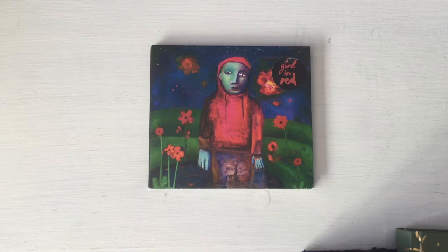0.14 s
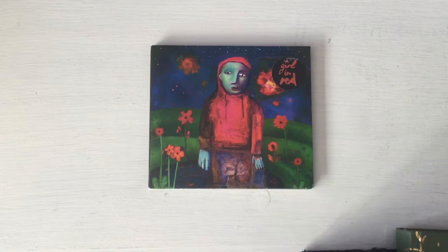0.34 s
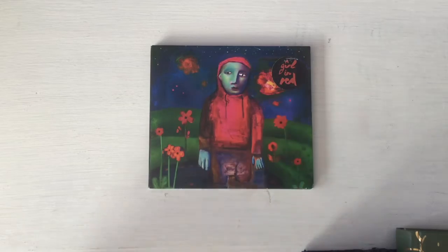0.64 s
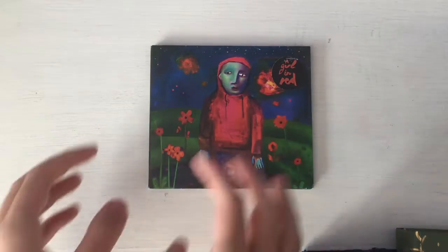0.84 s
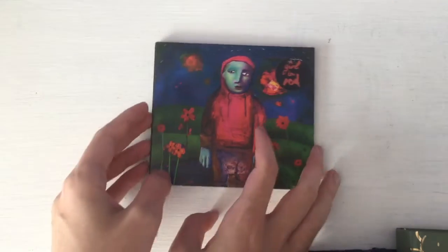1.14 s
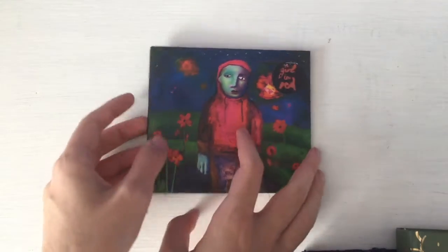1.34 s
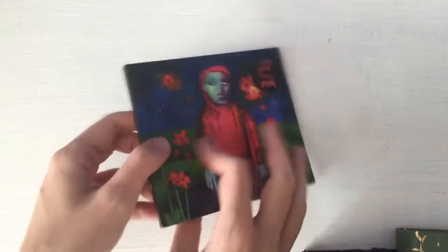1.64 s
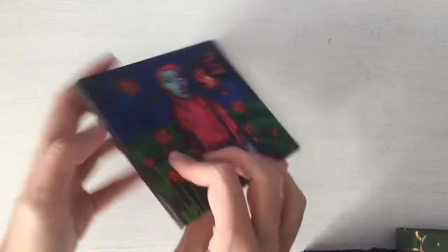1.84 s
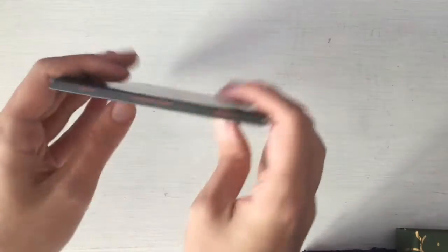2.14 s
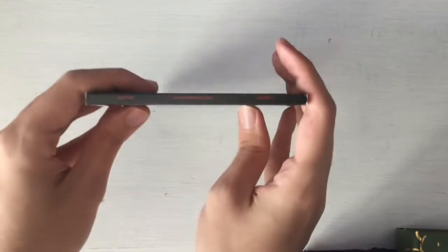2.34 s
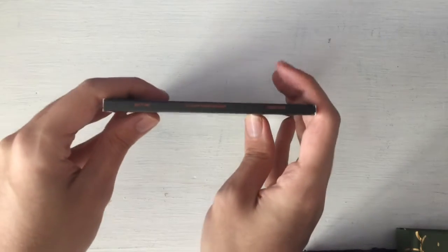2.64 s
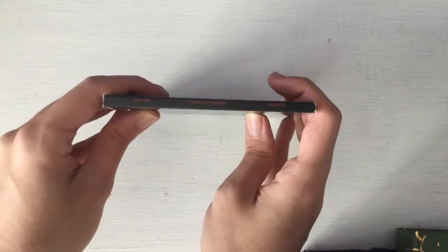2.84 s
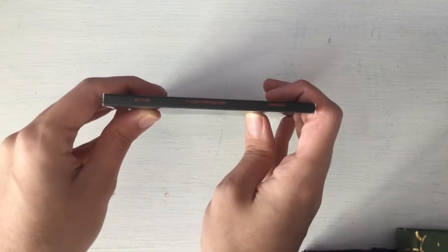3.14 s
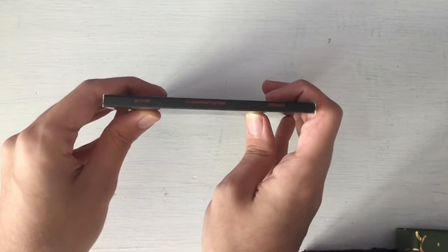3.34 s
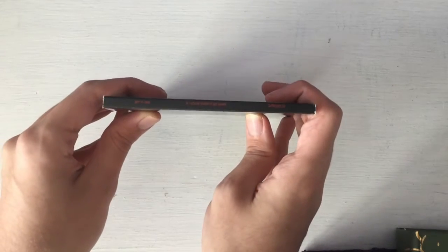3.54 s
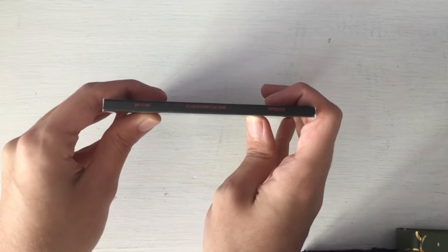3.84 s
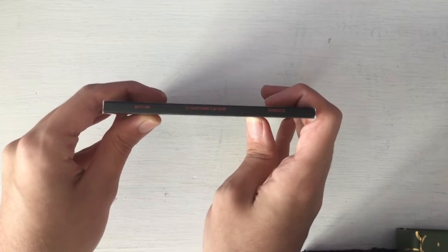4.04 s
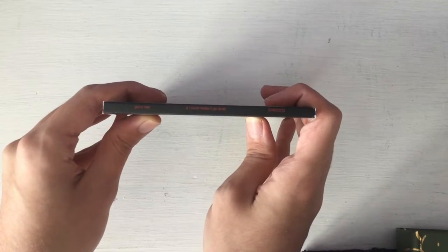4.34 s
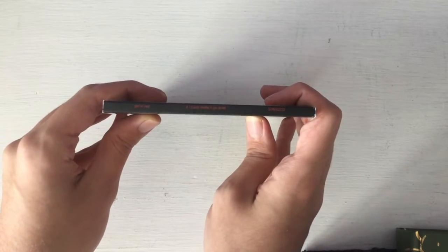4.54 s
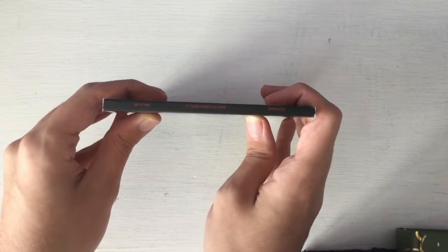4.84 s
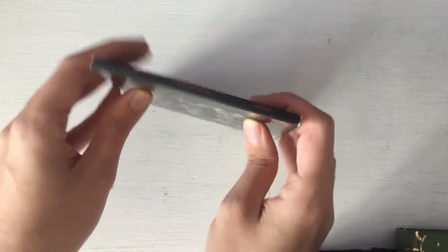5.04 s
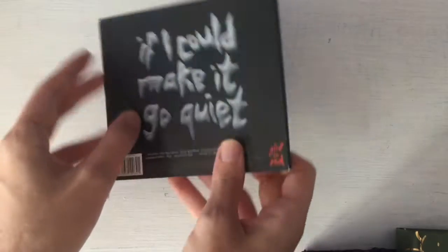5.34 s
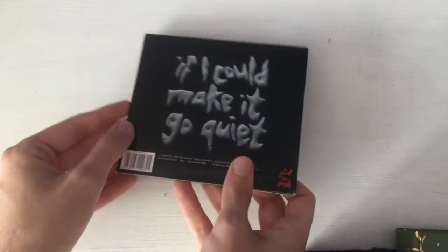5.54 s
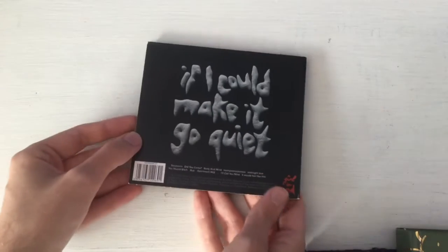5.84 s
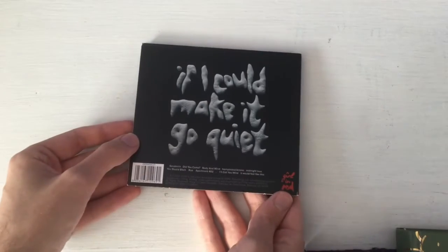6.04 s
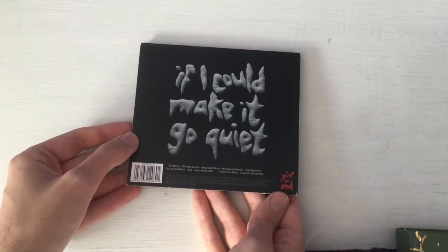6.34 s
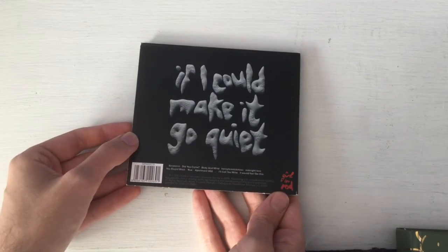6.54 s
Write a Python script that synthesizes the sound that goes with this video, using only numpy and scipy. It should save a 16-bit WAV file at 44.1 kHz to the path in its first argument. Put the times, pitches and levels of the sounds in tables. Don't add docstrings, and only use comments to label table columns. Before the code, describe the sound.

A quiet small room, captured close by a phone microphone with thin bass and slightly dulled top; low lumpy rumble and soft hiss run throughout. Only faint background rustle until about 1.0 s, when fingers touch a flat hollow cardboard case with light pads and papery skin slips. From 1.35 to 2.2 s a longer dry slide scrapes and fizzes over the gloss, with crisp ticks around 1.5 s and smaller ones near 2.0 s. At 2.5 s a hard regrip cracks and knocks, with a softer landing at 2.64 s, then faint brushes and dull taps until 3.2 s. Near stillness follows. At 4.9 s the case turns quickly: a strong hollow thump with clustered cracks at 4.95 s, scrapes easing by 5.15 s. From 5.3 s brighter slides, a sharp crack at 5.58 s, low taps near 5.7 s and tiny ticks to 5.9 s, then room tone until 6.7 s.

```python
import sys
import numpy as np
from scipy import signal
from scipy.fft import rfft, irfft, next_fast_len
from scipy.io import wavfile
from scipy.ndimage import uniform_filter1d

SR = 44100
rng = np.random.default_rng(int(sys.argv[2]) if len(sys.argv) > 2 else 0)


def convert_level_to_amplitude(level_db):
    exponent = np.asarray(level_db, float) / 20
    return 10 ** exponent


def generate_wav(signal):
    frames = np.transpose(np.atleast_2d(signal))
    scaled = np.clip(frames, -1, 1) * 32767
    pcm = np.round(scaled).astype(np.int16)
    wavfile.write(sys.argv[1], SR, pcm)


N = 294981

FLEX_HZ = 166
TICK_T60_S, TICK_RISE_S, TICK_CLICK = 0.019, 0.0011, 5.5
SNAP_T60_S, SNAP_RISE_S, SNAP_CLICK = 0.025, 0.000496, 5.5
CRACK_T60_S, CRACK_RISE_S, CRACK_CLICK = 0.009, 0.000403, 5.1


def evened(x):
    return x / np.sqrt(np.mean(x ** 2) + 1e-20)


def read(points, hz):
    f, value = np.transpose(points)
    return np.interp(np.log(hz + 1), np.log(f + 1), value)


def add(mix, s, sound):
    part = mix[round(s * SR):][:len(sound)]
    part += sound[:len(part)]


def colour(x, points):
    size = next_fast_len(len(x))
    gain = convert_level_to_amplitude(read(points, np.fft.rfftfreq(size, 1 / SR)))
    return evened(irfft(rfft(x, size) * gain, size)[:len(x)])


def resonate(x, hz, width):
    turn = np.exp(2j * np.pi * np.cumsum(hz * np.ones(len(x))) / SR)
    r = np.exp(-np.pi * width / SR)
    return 2 * (turn * signal.lfilter([1 - r], [1, -r], x / turn + 1e-18)).real


def slips(count, lumpy_db, lump_s):
    lumps = evened(uniform_filter1d(rng.standard_normal(count), max(round(lump_s * SR), 2)))
    catches = 1 + 2.5 * (rng.random(count) < 500 / SR)
    return evened(rng.standard_normal(count) * convert_level_to_amplitude(lumpy_db * lumps) * catches)


def patchy(x, patchy_db):
    z = signal.stft(x, nperseg=256)[2]
    patches = uniform_filter1d(rng.standard_normal(z.shape), 4, 0)
    patches = evened(uniform_filter1d(patches, 9, 1))
    return evened(signal.istft(z * convert_level_to_amplitude(patchy_db * patches), nperseg=256)[1][:len(x)])


def air():
    # frequency in Hz, level in dB per Hz
    air_spectrum = [(15, -53), (25, -14.5), (71, -1.5), (169, -2.5), (219, -5.5), (263, -6.5), (548, -18.5),
                    (694, -19), (1030, -24), (2250, -22), (2630, -22), (3900, -22), (8780, -23),
                    (13000, -31)]
    # time in seconds, lift in dB
    rustle = [(0, 4.5), (.55, 5), (.95, 8.5), (1.4, 6.5), (2.3, 3), (4.8, 3), (6.0, 4.5), (6.7, 2.5)]
    air_db, rumble_db = -66.5, 1.36
    frames, hz = N // 256 + 5, np.fft.rfftfreq(1024, 1 / SR)
    a, b = rng.standard_normal((frames, 513, 2)).T
    s, hiss_db = np.transpose(rustle)
    t = np.arange(frames) * 256 / SR
    lumps = evened(uniform_filter1d(rng.standard_normal(frames), 9))
    low = (1 / (1 + (hz / 420) ** 4))[:, None]
    drift = low * (rumble_db + 2.7 * lumps) + (1 - low) * np.interp(t, s, hiss_db)
    plain = signal.istft(a + 1j * b, nperseg=1024, noverlap=768)[1][:N]
    steady = colour(plain, air_spectrum + [(16000, -57)])
    z = signal.stft(steady, nperseg=1024, noverlap=768)[2]
    drifting = signal.istft(z * convert_level_to_amplitude(drift[:, :z.shape[1]]), nperseg=1024, noverlap=768)[1][:N]
    return convert_level_to_amplitude(air_db) * drifting


def squeeze(s, length, db):
    push = slips(round(length * SR), lumpy_db=2.8, lump_s=0.015)
    panel = resonate(resonate(push, 210, 92), 330, 230)
    flex = resonate(resonate(push, FLEX_HZ, 60), FLEX_HZ, 130)
    return s, convert_level_to_amplitude(db) * evened(panel + 0.4 * flex) * np.hanning(len(push))


def squeezes(mix):
    # start in seconds, length in seconds, level in dB
    grips = [(1.0, .12, -61), (1.09, .07, -52), (1.13, .06, -62), (1.28, 0.076, -63), (1.38, 0.29, -61.5),
             (1.9, .09, -62), (2.06, .12, -59), (2.5, 0.16, -53.5), (2.64, 0.23, -70), (2.88, .13, -56.5),
             (3.03, 0.22, -61), (4.89, .08, -63), (4.96, 0.084, -50.5), (5.0, .13, -60), (5.42, 0.066, -72),
             (5.665, 0.038, -56), (5.71, .1, -56.5)]
    for row in grips:
        add(mix, *squeeze(*row))


def thump(s, db, hz, t60, flex_db, panel):
    t = np.arange(round(0.25 * SR)) / SR
    ring = convert_level_to_amplitude(flex_db - 60 * t / 0.099) * np.sin(2 * np.pi * FLEX_HZ * t)
    for ratio, mode_db, share, side in panel:
        decay = convert_level_to_amplitude(mode_db - 60 * t / (t60 * share))
        ring = ring + np.sign(side) * decay * np.sin(2 * np.pi * hz * ratio * t)
    ring = -ring * (1 - np.exp(-t / 0.0027))
    return s + 0.002, convert_level_to_amplitude(db) * ring / abs(ring).max()


def thumps(mix):
    # time in seconds, peak in dB, pitch in Hz, t60 in seconds
    middle_taps = [(0.997, -53, 261, 0.17), (1.101, -50, 178, 0.082), (1.141, -45.5, 277, 0.15),
                   (1.17, -42, 268, 0.044), (1.304, -48, 273, 0.064), (1.326, -53, 258, 0.06),
                   (1.537, -52, 387, 0.13), (2.679, -50.5, 270, 0.062), (2.918, -52, 261, 0.15),
                   (2.954, -41, 268, 0.055), (3.0275, -38.5, 282, 0.042), (3.554, -49.5, 147, 0.16),
                   (4.9513, -32, 285, 0.04), (4.9548, -21.5, 285, 0.1), (4.974, -41, 190, .045),
                   (4.981, -35, 348, 0.055), (4.996, -44, 330, .05), (5.6662, -38.5, 277, 0.064),
                   (5.734, -38, 176, 0.063), (5.755, -42.5, 278, 0.16), (5.772, -46, 270, 0.057),
                   (6.36, -57, 151, 0.067)]
    edge_taps = [
        (1.023, -51.5, 354, 0.062),
        (2.072, -52.5, 236, 0.061),
        (2.121, -42, 160, 0.09),
        (2.507, -36, 277, 0.12),
        (2.6375, -40, 265, 0.07),
        (2.803, -45, 259, 0.089),
        (3.076, -46.5, 155, 0.14),
        (3.147, -50, 340, 0.07),
        (4.92, -41.5, 276, 0.27),
        (5.575, -43.5, 254, 0.093),
    ]
    # pitch ratio, level in dB, share of the t60, side of the node line (+1 or -1)
    middle_modes = [(1.0, 11, 0.64, 1), (1.3, -7.5, .9, 1), (1.53, -5.5, 0.86, -1), (1.93, -15.5, 1, 1),
                    (2.6, -29, 0.56, -1)]
    edge_modes = [(1.0, 11, 0.7, 1), (1.3, -12, .9, 1), (1.53, -8, 1.3, -1), (1.93, -16, 1.3, 1),
                  (2.33, -24, 1.1, -1)]
    for rows, flex_db, modes in ((middle_taps, -17, middle_modes), (edge_taps, -2.5, edge_modes)):
        for row in rows:
            add(mix, *thump(*row, flex_db, modes))


def knock(s, db, hz, contact):
    lag_s = 0.0005
    t = np.arange(0, contact, 1 / SR)
    swing = np.cos(2 * np.pi * hz * (t - contact / 2 - lag_s))
    return s, convert_level_to_amplitude(db) * swing * np.sin(np.pi * t / contact) ** 2


def knocks(mix):
    # time in seconds, peak in dB, pitch in Hz, contact in seconds
    landings = [
        (2.4993, -19, 295, .008),
        (2.5064, -25.5, 275, .0085),
        (2.6356, -31.5, 225, .0095),
        (3.1405, -43, 330, .008),
        (1.3185, -45, 270, .011),
    ]
    for row in landings:
        add(mix, *knock(*row))


def tick(s, db, hz, treble_db, t60, rise, click):
    grit = rng.standard_normal(5000)
    t = np.arange(len(grit)) / SR - 0.005
    onset = np.exp(np.minimum(t - rise, 0) / rise)
    burst = grit * onset * convert_level_to_amplitude(-60 * np.maximum(t, 0) / t60)
    tail = grit * onset * convert_level_to_amplitude(-60 * np.maximum(t, 0) / 0.12)
    gritty = burst + convert_level_to_amplitude(-21) * tail
    struck = gritty + click * np.exp(-((t - rise) * SR) ** 2)
    width = min(350 + 0.15 / rise, 0.4 * hz)
    body = resonate(resonate(struck, hz, width), hz, 3.1 * width)
    overtone = resonate(resonate(struck, 1.45 * hz, 1.1 * hz), 1.59 * hz, 1.5 * hz)
    body = body + convert_level_to_amplitude(-16) * overtone
    body = signal.sosfilt(signal.butter(3, 0.54 * hz, "highpass", fs=SR, output="sos"), body)
    treble = resonate(resonate(gritty, 9100, 2500), 9000, 4000)
    broad = resonate(resonate(resonate(gritty, 8000, 5500), 6900, 6000), 7000, 6000)
    treble = treble + convert_level_to_amplitude(-6) * broad
    sound = body / abs(body).max() + convert_level_to_amplitude(treble_db - 2.0) * treble / abs(treble).max()
    return s - 0.005, convert_level_to_amplitude(db) * sound


def ticks(touch):
    # time in seconds, peak in dB, ring in Hz, treble in dB
    edge_ticks = [(1.1033, -43.5, 3450, -5), (1.1677, -48.5, 2100, -20), (1.2281, -52, 1540, -2),
                  (1.4918, -31.5, 2120, -13), (1.5393, -27, 2200, -14), (1.9135, -41.5, 2940, 3),
                  (1.942, -36, 2110, -5), (2.0078, -35, 2950, -22), (2.0175, -38, 2930, -14),
                  (2.028, -39, 2950, -18), (2.072, -40, 1650, -7), (2.1216, -35.5, 1640, -14),
                  (2.6632, -56, 2580, -3), (2.681, -54.5, 2580, -3), (2.9344, -48.5, 2600, 5.5),
                  (3.027, -54, 1380, 10), (4.9123, -40, 4800, -12), (4.9994, -40.5, 1290, -12),
                  (5.0675, -33.5, 2050, -16), (5.5928, -53, 1220, -21), (5.642, -42.5, 2616, -20),
                  (5.6841, -45, 1360, -22), (5.7435, -49, 3380, -25), (5.848, -49, 1320, -11),
                  (5.8755, -51, 1370, -8), (5.8999, -51.5, 1340, -3)]
    snaps = [
        (1.011, -55, 2120, 5),
        (1.5836, -35, 1900, -12),
        (2.956, -55, 680, -20),
        (3.029, -53, 760, -20),
        (2.6365, -48, 600, -20),
        (2.804, -60, 2600, 13),
        (3.141, -52, 560, -14),
        (5.328, -45, 2400, -3),
        (5.6683, -41, 4500, -5),
        (5.668, -46, 1900, -20),
    ]
    cracks = [(2.4988, -27, 3600, -27), (2.4993, -26.5, 1950, -30), (4.8447, -54, 3400, 3.5),
              (4.9245, -36, 2500, 5), (4.9578, -22.5, 2150, -16), (4.967, -38, 4400, -2),
              (4.975, -36, 4000, 0.1), (4.9835, -32, 2000, 1.1), (5.335, -45, 3660, -28),
              (5.3352, -44, 1900, -28), (5.3815, -41, 2800, -14), (5.5762, -23.5, 2500, -11),
              (5.708, -41, 3380, -25)]
    flicks = [(1.5372, -40, 7600, -3), (1.5565, -46, 6800, -2), (1.6395, -42, 2110, -20),
              (1.699, -44, 4000, -8), (1.848, -45, 2270, -12), (1.9085, -43, 3440, -2),
              (2.5045, -40, 3500, -15), (4.8928, -48, 1900, -12), (4.9615, -40, 9200, -5),
              (5.034, -50, 3800, -6), (5.0668, -39, 6500, -2), (5.102, -55, 5000, -2),
              (5.1357, -53, 6620, -2), (5.595, -46, 5200, -6), (5.7254, -50, 2050, -15),
              (1.109, -49, 3450, -12), (1.126, -52, 8700, -3), (4.9285, -38, 2600, -6),
              (4.9175, -40, 3900, -3), (5.577, -33, 1350, -30), (4.9585, -29, 3200, -25),
              (5.0705, -42, 1300, -25), (5.329, -49, 3900, -10), (5.3385, -48, 3500, -25),
              (4.979, -40, 4600, -10), (4.912, -44, 1400, -20), (4.923, -41, 1350, -20),
              (5.7575, -52, 6100, -4), (5.776, -52, 2400, -12), (1.058, -48, 4550, -20),
              (1.547, -42, 4500, -4), (2.125, -48, 6200, -10), (2.014, -46, 5200, -12),
              (5.686, -52, 3800, -15), (2.4992, -35, 5300, -20), (2.5, -38, 760, -40),
              (4.959, -35, 800, -40), (4.967, -39, 9000, -8), (4.9755, -40, 8800, -8)]
    for rows, *contact in ((edge_ticks, TICK_T60_S, TICK_RISE_S, TICK_CLICK),
                           (snaps, SNAP_T60_S, SNAP_RISE_S, SNAP_CLICK),
                           (cracks, CRACK_T60_S, CRACK_RISE_S, CRACK_CLICK),
                           (flicks, CRACK_T60_S, SNAP_RISE_S, TICK_CLICK)):
        for row in rows:
            add(touch, *tick(*row, *contact))


def scuff(s, length, db, hz, width):
    rasp = slips(round(length * SR), lumpy_db=0.0, lump_s=0.0017)
    band = evened(resonate(resonate(rasp, hz, width), hz, 2.3 * width))
    return s, convert_level_to_amplitude(db) * band * signal.windows.tukey(len(rasp), 0.6)


def scuffs(touch):
    # start in seconds, length in seconds, level in dB, centre in Hz
    pad_brushes = [(1.096, 0.032, -56.5, 1180), (1.533, .029, -48.5, 7600), (1.889, 0.057, -51, 2960),
                   (2.931, .03, -64, 8400), (3.025, .023, -60, 9300), (4.876, .045, -60, 2300),
                   (4.899, 0.045, -44, 3500), (4.894, 0.051, -49.5, 8000), (4.944, .049, -47.5, 3800),
                   (4.952, .03, -44, 880), (5.334, .016, -60, 770), (5.385, .05, -55, 3000),
                   (5.848, .081, -66, 3200), (1.465, 0.14, -61, 860), (5.575, .024, -45.5, 2300),
                   (2.496, 0.039, -55, 2600), (5.063, .026, -54, 4100), (1.651, .14, -56, 2800),
                   (1.02, .11, -61, 5600), (5.4, 0.16, -61, 5900), (1.228, .036, -59, 5300),
                   (5.724, 0.069, -62.5, 1200), (2.487, .013, -56, 3200), (2.65, .13, -70, 7500),
                   (2.84, .1, -72, 7500), (1.59, .07, -58, 9300), (1.6, .06, -58, 2000),
                   (1.7, .14, -60, 2200), (5.39, .035, -62, 8800), (1.24, .09, -70, 2000),
                   (4.99, .025, -54, 3200)]
    edge_brushes = [(1.364, .078, -58.5, 1660), (1.355, 0.14, -56.5, 3900), (2.0, 0.034, -51, 2830),
                    (4.915, .033, -46.5, 2430), (4.941, 0.043, -50.5, 9500), (5.577, 0.037, -51, 1240),
                    (5.842, 0.081, -62, 1250), (1.008, .082, -62.5, 2400), (1.75, .17, -56, 2900),
                    (1.93, 0.11, -54.5, 3000), (5.445, .12, -59, 4000), (2.8, 0.036, -67, 6500),
                    (3.024, .026, -59, 5800)]
    squeaks = [
        (1.03, .11, -59.5, 4550),
        (1.045, .066, -64, 1260),
        (1.012, .065, -63, 8600),
        (1.012, .03, -66, 7500),
        (1.03, .05, -66, 6200),
        (1.11, .03, -63, 8700),
        (5.03, .015, -58, 3800),
        (5.032, .022, -64, 1370),
        (1.104, .036, -55, 293),
    ]
    for rows, share in ((pad_brushes, 0.58), (edge_brushes, 0.27), (squeaks, 0.045)):
        for s, length, db, hz in rows:
            add(touch, *scuff(s, length, db, hz, share * hz))


def shimmer(slide):
    gloss_t60_s, gloss_db = 0.045, -1.5
    t = np.arange(round(0.06 * SR)) / SR
    modes = rng.standard_normal(len(t)) * convert_level_to_amplitude(-60 * t / gloss_t60_s)
    rung = signal.oaconvolve(slide, modes / np.linalg.norm(modes))[:N]
    return (slide + convert_level_to_amplitude(gloss_db) * rung) / np.sqrt(1 + convert_level_to_amplitude(2 * gloss_db))


def stroke(rows):
    # frequency in Hz, level in dB per Hz
    scrape_spectrum = [(290, -56), (500, -30), (1600, 3), (1910, 7.5), (2670, -14), (3020, -15),
                       (4350, 5.5), (6000, -1), (7800, -45), (13200, -120)]
    fizz_spectrum = [(3500, -33), (5500, -1.5), (8800, 4.5), (11000, 0.5), (13000, 0.5), (14500, -8),
                     (16000, -14)]
    # frequency in Hz, width in Hz, level in dB
    card_modes = [(1367, 33, -1.5), (2150, 190, 4), (2950, 120, -2), (3400, 92, 3.5), (4500, 83, -49),
                  (990, 40, -9), (2500, 64, -2.5), (3970, 90, -3)]
    fizz_slow_db, fizz_fast_db = -21.5, 8
    s, *columns = np.transpose(rows)
    t = np.arange(s[0], s[-1], 1 / SR)
    scrape_db, hz, speed = (np.interp(t, s, c) for c in columns)
    fizz_db = scrape_db + fizz_slow_db + (fizz_fast_db - fizz_slow_db) * speed
    drive = slips(len(t), lumpy_db=-3.0, lump_s=0.0021)
    card = np.zeros(len(t))
    for f, width, db in card_modes:
        card += convert_level_to_amplitude(db) * evened(resonate(slips(len(t), lumpy_db=4.0, lump_s=0.045), f, width))
    contact = evened(resonate(resonate(drive, hz, 1340), hz, 1700))
    scrape = evened(colour(drive, scrape_spectrum) + contact + convert_level_to_amplitude(2.5) * evened(card))
    fizz = colour(0.28 * drive + 1.5 * slips(len(t), lumpy_db=1.5, lump_s=0.016), fizz_spectrum)
    sound = convert_level_to_amplitude(scrape_db) * patchy(scrape, patchy_db=3) + convert_level_to_amplitude(fizz_db) * patchy(fizz, patchy_db=3.5)
    fade = np.minimum(np.minimum(t - s[0], s[-1] - t) / 0.0025, 1)
    return s[0], sound * fade


def strokes():
    # time in seconds, pressure in dB, contact resonance in Hz, slide speed from 0 to 1
    first_strokes = [
        [(1.01, -64, 3270, .8), (1.048, -60, 3970, .68), (1.1, -63, 2950, .6), (1.14, -60, 3080, .72)],
        [(1.14, -62, 2370, .3), (1.228, -73, 1900, .93), (1.268, -62, 2260, 0.7), (1.324, -65.5, 2160, .05),
         (1.355, -81, 2520, .8)],
        [(1.357, -67, 1900, 0.56), (1.431, -57, 3060, 0.5), (1.481, -53.5, 2240, 0.37), (1.549, -56, 2100, .52),
         (1.615, -54, 1950, 0.58), (1.695, -53.5, 3010, 0.71), (1.731, -54.5, 2600, .88),
         (1.887, -58, 2850, 0.6)],
        [(1.887, -57.5, 2850, 0.7), (1.949, -54.5, 2360, .48), (1.991, -57.5, 2920, .7),
         (2.057, -58.5, 2830, 0.76), (2.12, -57, 1710, .85), (2.155, -68, 1710, 0.7),
         (2.193, -71.5, 2360, 0.98), (2.3, -75, 2340, .6)],
    ]
    later_strokes = [
        [(2.47, -71, 2290, .3), (2.58, -74, 2250, .5), (2.648, -73, 2530, 0.87), (2.828, -71, 2510, 0.6),
         (2.87, -92, 3110, .85)],
        [(2.88, -80, 2480, .73), (2.94, -73, 2430, .73), (3.05, -78, 1720, .75), (3.2, -86, 3140, .7)],
        [(4.84, -79, 3080, .87), (4.953, -54, 2610, .28)],
        [(4.953, -45, 2490, .05), (4.998, -58, 2430, .47), (5.04, -61, 2150, .57), (5.14, -68.5, 2200, .82)],
        [(5.32, -74, 2780, .7), (5.378, -62, 2640, .47)],
        [(5.378, -56, 2840, 0.47), (5.424, -58, 2860, .73), (5.46, -64, 3860, .6), (5.498, -63, 3930, .68),
         (5.575, -58.5, 3700, 0.57)],
        [(5.575, -51, 2450, .2), (5.636, -67.5, 2220, .37), (5.666, -59, 2200, .2), (5.702, -63, 2160, .17),
         (5.738, -58.5, 2110, .43), (5.838, -76.5, 1350, .83), (5.95, -73, 1500, .6)],
    ]
    slide = np.zeros(N)
    for rows in first_strokes + later_strokes:
        add(slide, *stroke(rows))
    return shimmer(slide)


def scene():
    mix, touch = air(), np.zeros(N)
    squeezes(mix)
    thumps(mix)
    knocks(mix)
    ticks(touch)
    scuffs(touch)
    touch = signal.sosfilt(signal.butter(8, 13700, fs=SR, output="sos"), touch)
    return (mix + strokes() + touch)[None]


def top_cut(x):
    return signal.sosfilt(signal.butter(12, 15690, fs=SR, output="sos"), x)


def record(dry):
    mic_low_hz, mic_high_hz, edge_hz = 55.4, 14400, 15650
    mic = signal.butter(3, [mic_low_hz, mic_high_hz], "bandpass", fs=SR, output="sos")
    heard = signal.sosfilt(mic, dry)
    heard = signal.oaconvolve(heard, signal.firwin(255, edge_hz, fs=SR)[None], "same")
    return top_cut(heard)


dry = scene()
out = record(dry)
generate_wav(out)
```